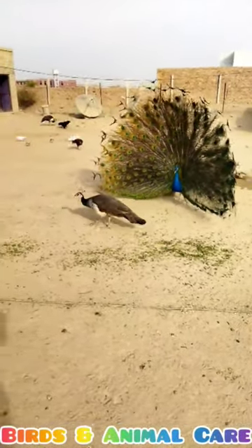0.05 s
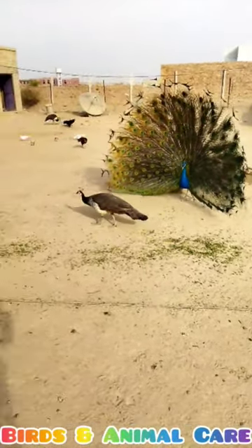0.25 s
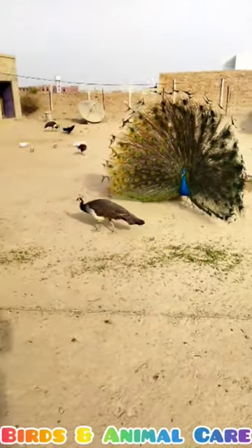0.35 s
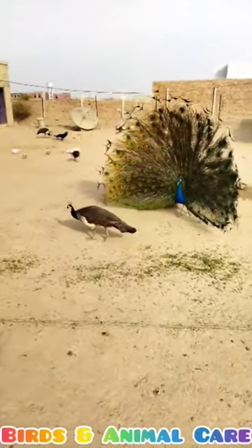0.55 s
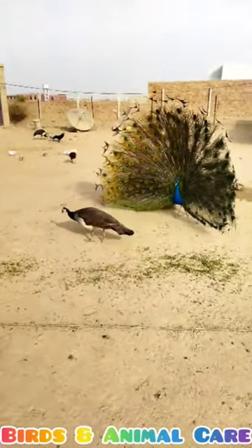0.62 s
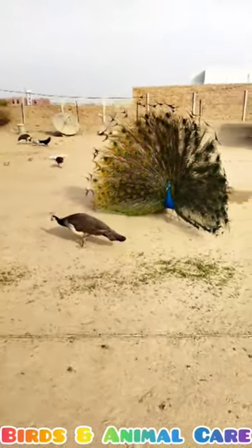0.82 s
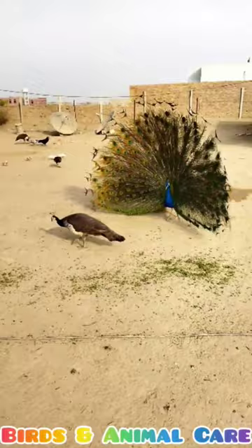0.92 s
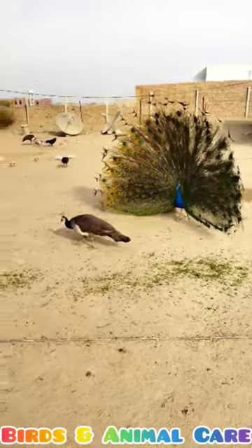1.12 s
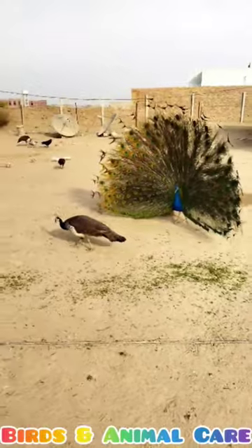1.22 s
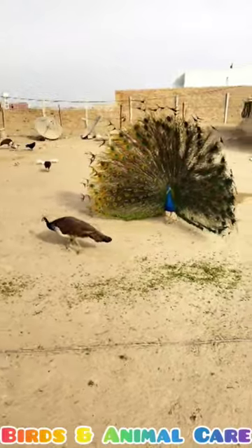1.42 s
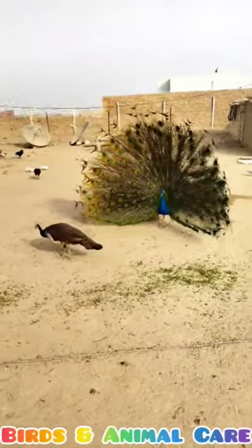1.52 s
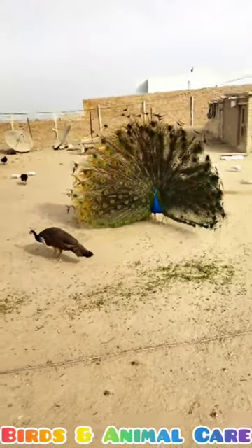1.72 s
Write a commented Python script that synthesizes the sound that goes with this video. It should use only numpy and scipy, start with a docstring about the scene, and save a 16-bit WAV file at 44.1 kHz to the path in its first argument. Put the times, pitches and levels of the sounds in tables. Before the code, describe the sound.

Two loud nasal peafowl cries ring across a walled farmyard over faint chirps, clucks and low rumble

```python
"""Walled farm yard: a peafowl gives two loud, arching, brassy calls, each a stack of overtones with rasp.
Reflections colour the calls differently in each ear; wall echoes and decaying noise leave a short tail.
Small birds chirp in gliding two-voice whistles; fowl cluck and coo softly as low tones with an octave.
Under it lies a low outdoor rumble with hiss: noise in wavering bands."""
import sys
import numpy as np
from scipy import signal
from scipy.fft import rfft, irfft
from scipy.io import wavfile
from scipy.ndimage import uniform_filter1d

SR = 44100
rng = np.random.default_rng(int(sys.argv[2]) if len(sys.argv) > 2 else 0)


def int16_out(signal):
    """Quantize to a 16-bit WAV file."""
    q = np.round(np.clip(np.atleast_2d(signal).T, -1, 1) * 32767)
    wavfile.write(sys.argv[1], SR, q.astype(np.int16))


N = 77175
TIME_S = np.arange(N) / SR

# Peafowl call contours: (time [s], pitch [Hz], level [dB])
CALL_ONE = [(0.228, 330, -53), (0.242, 366.2, -35.5), (0.26, 463, -34), (0.28, 552.7, -32),
            (0.297, 595, -27), (0.33, 593.8, -32), (0.365, 612.4, -29), (0.4, 603.8, -32.5),
            (0.445, 598, -31), (0.49, 568.4, -30.5), (0.53, 542.5, -30.5), (0.58, 513, -36),
            (0.597, 484, -35), (0.612, 400, -41.5)]
CALL_TWO = [(0.957, 330, -47), (0.975, 387, -43), (0.99, 461.6, -34.5), (1.007, 529.5, -36),
            (1.03, 596.7, -33), (1.06, 620, -31.5), (1.09, 649.9, -34.5), (1.135, 643.3, -34.5),
            (1.18, 624.4, -40), (1.2, 648.5, -40.5), (1.222, 648, -34.5), (1.245, 608.5, -34),
            (1.262, 595, -32.5), (1.29, 554.6, -31), (1.312, 549.4, -44), (1.335, 442.3, -36)]
# Throat resonances: (frequency [Hz], relative gain [dB])
THROAT = [(600, -34.5), (900, -18), (1200, -15.5), (1430, -9), (1700, -0.5), (1930, 3), (2280, -6.5),
          (2550, -4), (3050, -21), (3600, -26), (4200, -24), (4600, -17), (5000, -36), (5500, -35.5),
          (6500, -31.5), (8000, -46), (12000, -49.5), (15000, -61)]
# Reflection colour at the ears: (frequency [Hz], left-right level [dB], left-right phase lead [rad])
EAR_COLOUR = [(920, 3, 1.4), (1177, -8.5, -1), (1327, -2, 6), (1440, 21, -4), (1435, 4.5, 3.8),
              (1666, -8.5, -1.5), (1750, -6, -2.5), (1934, 8, -4.5), (2068, 4, 0.5), (2254, -18, 2.2),
              (2263, -9, -0.27), (2587, 8, 3.16), (2528, 5.5, 1.37), (2690, -3, 2), (4860, 0.5, 1.84),
              (7000, -2, 2), (9300, -1.5, 1.5)]
# Breath rasp spectrum shape: (frequency [Hz], relative density [dB per Hz])
RASP_SPECTRUM = [(700, -42), (1200, -31), (1700, -16), (2300, -23), (3100, 1), (4500, 4.5), (5500, 3),
                 (6700, -10), (8500, -1.5), (12000, -19), (15000, -18)]
# Small-bird whistles: (start [s], length [s], start pitch [Hz], middle pitch [Hz], end pitch [Hz],
#   level [dB], left-right level [dB], upper voice re lower [dB])
CHIRPS = [(0, 0.043, 3426, 4020, 4160, -54.5, 2, -35), (0.03, .045, 3774, 4540, 3580, -52.5, 2, -29),
          (0.064, 0.072, 4850, 4540, 3660, -53, 2.5, -6), (0.129, 0.016, 3160, 3250, 3650, -55, 17, -23),
          (.145, .014, 3700, 3920, 3700, -53, 0, 1.5), (0.17, 0.01, 3390, 3240, 3450, -53, 18, -9.5),
          (0.18, 0.051, 3750, 3810, 4150, -56.5, 5, -18), (0.22, 0.024, 6040, 6130, 6200, -55.5, 7, -25),
          (0.601, 0.042, 4540, 4500, 4930, -49, 7, -26), (0.648, 0.073, 3775, 4267, 3685, -43, 2, -1.5),
          (0.728, 0.069, 7100, 7600, 8500, -69.5, 8, 4), (0.753, 0.11, 5310, 5800, 5330, -66, 5, 1.5),
          (1.175, 0.0275, 4250, 5110, 5200, -53, -2, -3), (1.183, 0.043, 3190, 3680, 3920, -51.5, 4, 1),
          (1.212, 0.026, 4030, 3930, 3680, -57, 0, -21), (1.24, .024, 3410, 3820, 3640, -51, -3, -17),
          (1.315, 0.018, 4210, 4500, 4820, -49.5, 2, -30), (1.358, .066, 3600, 4266, 3850, -46.5, 1, 4.5),
          (1.53, 0.03, 4280, 4440, 4880, -50.5, -2, -3), (1.566, 0.075, 3550, 4204, 3740, -53.5, 0, 6.5),
          (1.726, 0.033, 5000, 6060, 6140, -64, 6, -8)]
# Fowl clucks: (start [s], length [s], mid pitch [Hz], peak level [dB], octave re fundamental [dB])
CLUCKS = [(0.723, 0.023, 250, -55, -1.5), (0.814, 0.02, 335, -46.5, -39), (0.856, .024, 320, -61, -28),
          (0.905, .028, 325, -48.5, -34), (1.296, 0.038, 480, -55, -20), (1.348, 0.015, 235, -63.5, 8.5),
          (1.574, 0.084, 390, -67.5, 8)]
# Fowl coo contour: (time [s], pitch [Hz], level [dB])
COO = [(1.09, 256.4, -57), (1.13, 264.6, -55.5), (1.17, 289, -60), (1.24, 296.7, -57), (1.28, 329, -58.5),
       (1.32, 278.5, -60)]
# Wall echoes: (delay [s], level re direct [dB], left-right level [dB])
ECHOES = [(.0095, -21, 2), (.019, -22, -3), (.036, -24, 2), (.078, -24, 0)]
# Outdoor noise spectrum shape: (frequency [Hz], relative density [dB per Hz])
AIR_SPECTRUM = [(25, -80), (45, -28.5), (70, -0.5), (110, -1), (180, -1), (280, -6.5), (400, -9.5),
                (550, -6.5), (800, -13), (1300, -14), (2000, -11), (3000, -15), (4200, -17.5), (5500, -21),
                (8000, -31.5), (10500, -31), (12500, -26), (15500, -35)]
# Likeness of the outdoor noise at the ears: (frequency [Hz], left-right correlation [-1 to 1])
EAR_LIKENESS = [(60, 1), (250, 0.81), (600, 0.74), (1500, 0), (4000, 0), (12000, 0.084)]

# Peafowl
VOICE_DB = -1.6
ATTACK_S, RELEASE_S = 0.0056, 0.013  # shared with the coo
JITTER_SHARE, JITTER_HZ = 0.00603, 246  # rms share of pitch
FLUTTER_DB_AT_THIRD, FLUTTER_HZ = 1.5, 26.4  # grows with harmonic number up to the ninth
CLEAR_PITCH_HZ, SLACK_PITCH_HZ = 626, 454  # harsher as pitch drops
RASP_CLEAR_DB, RASP_SLACK_DB = -29, -18
BEAK_OPENS_S, BEAK_CENTRE_HZ, BEAK_CUT_DB_PER_OCTAVE = 0.034, 1500, 17
EDGE_CENTRE_HZ, EDGE_ONE_DB, EDGE_TWO_DB = 2390, 0, 3.5  # upper-overtone bite of each call
# Chirps
UPPER_OFFSET_HZ, UPPER_END_SPREAD_HZ = 280.5, 292  # spread adds at both ends of a chirp
CHIRP_SECOND_DB, CHIRP_JITTER_SHARE, CHIRP_BEND_POWER = -18, 0.015, 1.9
CHIRP_FLUTTER_DB, CHIRP_RIGHT_LAG_S = 1.2, 0.00005
CHIRP_ECHO_DB, CHIRP_TAIL_DB = 0.5, -2.5  # added to the yard levels
# Fowl
COO_SECOND_DB = -7
CLUCK_FALL_SHARE, CLUCK_JITTER_SHARE = 0.16, 0.0525
# Yard, outdoor noise, top cut
YARD_DB, YARD_T60_S = -10, 0.27
FAR_DB, FAR_T60_S = -16, 0.5
AIR_DB, AIR_WAVER_DB = -55.5, 2.1
CUTOFF_HZ = 15600


def from_db(db):
    """Convert decibels to amplitude gain."""
    return 10 ** (np.asarray(db) / 20)


def rms_one(x):
    """Scale to unit rms."""
    return x / np.sqrt(np.mean(x ** 2) + 1e-20)


def at_hz(points, hz, axis=1):
    """Interpolate a table column over log frequency."""
    table = np.array(points)
    return np.interp(np.log(np.maximum(hz, 1)), np.log(table[:, 0]), table[:, axis])


def drift(hz):
    """Unit-rms random curve: noise through a two-pole low-pass."""
    pole = np.exp(-2 * np.pi * hz / SR)
    noise = rng.standard_normal(2 * N)
    smooth = signal.lfilter([1], [1, -2 * pole, pole * pole], noise)
    return rms_one(smooth[N:])  # drop the filter's start-up


def pan(db):
    """Left and right gains of unit mean power for a level difference."""
    gains = from_db(np.array([db, -db]).reshape(2, -1) / 2)
    return gains / np.sqrt(np.mean(gains ** 2, axis=0))


def running_phase(hz):
    """Integrate a pitch curve to phase in radians."""
    return 2 * np.pi * np.cumsum(hz) / SR


def contour(rows):
    """Smoothed pitch and gain of one call, faded at both ends."""
    time_s, pitch_hz, level_db = np.transpose(rows)
    fade_in = np.clip((TIME_S - time_s[0]) / ATTACK_S + 1, 0, 1)
    fade_out = np.clip((time_s[-1] - TIME_S) / RELEASE_S + 1, 0, 1)
    hz = uniform_filter1d(np.interp(TIME_S, time_s, pitch_hz), size=250)
    return hz, fade_in * fade_out * from_db(np.interp(TIME_S, time_s, level_db))


def peafowl_rasp(hz, phase):
    """Breath noise puffs once per voice cycle, stronger as the pitch drops."""
    puffs = rng.standard_normal((2, N)) * (1 + np.cos(phase))
    shape = from_db(at_hz(RASP_SPECTRUM, np.fft.rfftfreq(N, 1 / SR)))
    rasp = rms_one(irfft(rfft(puffs) * shape, N))
    rasp_db = np.interp(hz, [SLACK_PITCH_HZ, CLEAR_PITCH_HZ], [RASP_SLACK_DB, RASP_CLEAR_DB])
    return from_db(rasp_db) * rasp


def peafowl(rows, edge_db):
    """Overtones glide through fixed throat resonances while the opening beak widens the spectrum."""
    hz, loud = contour(rows)
    phase = running_phase(hz * (1 + JITTER_SHARE * drift(JITTER_HZ)))
    voice, on = np.zeros((2, N)), loud > 0
    shut = np.clip(1 - (TIME_S[on] - rows[0][0]) / BEAK_OPENS_S, 0, 1)
    for k in range(1, 25):
        f = k * hz[on]
        edge = edge_db * np.clip(1 + 2 * np.log2(f / EDGE_CENTRE_HZ), 0, 1)
        beak_cut = BEAK_CUT_DB_PER_OCTAVE * shut * np.abs(np.log2(f / BEAK_CENTRE_HZ))
        flutter = FLUTTER_DB_AT_THIRD * min(k / 3, 3) * drift(FLUTTER_HZ)[on]
        gain = from_db(VOICE_DB + at_hz(THROAT, f) + edge - beak_cut + flutter)
        ear_gain = uniform_filter1d(gain * pan(at_hz(EAR_COLOUR, f)), size=250)
        lead = uniform_filter1d(at_hz(EAR_COLOUR, f, axis=2), size=400)
        ear_lead = lead * np.array([[0.5], [-0.5]])
        start_phase = rng.uniform(0, 2 * np.pi)
        voice[:, on] += np.sqrt(2) * ear_gain * np.sin(k * phase[on] + ear_lead + start_phase)
    return loud * (voice + peafowl_rasp(hz, phase))


def chirps():
    """Gliding whistles from both sides of the syrinx, one voice a little above the other."""
    out, waver = np.zeros((2, N)), 1 + CHIRP_JITTER_SHARE * drift(133)
    for start_s, length_s, start_hz, mid_hz, end_hz, db, side_db, upper_db in CHIRPS:
        on = (TIME_S > start_s) & (TIME_S < start_s + length_s)
        u = 2 * (TIME_S[on] - start_s) / length_s - 1  # -1 at start, 1 at end
        bend = np.abs(np.sin(u * np.pi / 2)) ** CHIRP_BEND_POWER
        hz = (mid_hz + (np.where(u < 0, start_hz, end_hz) - mid_hz) * bend) * waver[on]
        swell = np.sqrt(1 - u * u)
        lower = running_phase(hz)
        upper = running_phase(hz + UPPER_OFFSET_HZ + UPPER_END_SPREAD_HZ * u * u)
        tone = np.sin(lower) + from_db(CHIRP_SECOND_DB) * np.sin(2 * lower)
        tone += from_db(upper_db) * swell ** 2 * np.sin(upper)
        out[:, on] += np.sqrt(2) * from_db(db) * pan(side_db) * swell * tone
    out[1] = np.interp(TIME_S - CHIRP_RIGHT_LAG_S, TIME_S, out[1])
    return out * from_db(CHIRP_FLUTTER_DB * drift(134))


def coo():
    """A faint low tone with its octave rises, then drops at the end."""
    hz, loud = contour(COO)
    phase = running_phase(hz * (1 + 0.018 * drift(70)))
    return np.sqrt(2) * loud * (np.sin(phase) + from_db(COO_SECOND_DB) * np.sin(2 * phase))


def clucks():
    """Short, rough, falling low tones, each with its octave."""
    out, waver = np.zeros(N), 1 + CLUCK_JITTER_SHARE * drift(115)
    for start_s, length_s, pitch_hz, db, octave_db in CLUCKS:
        u = np.clip((TIME_S - start_s) / length_s, 0, 1)
        phase = running_phase(pitch_hz * waver * (1 - CLUCK_FALL_SHARE * (u - 0.5)))
        tone = np.sin(phase) + from_db(octave_db) * np.sin(2 * phase)
        out += from_db(db) * np.sin(np.pi * u) ** 2 * tone
    return np.sqrt(2) * out


def yard(x, echo_db, tail_db):
    """Direct sound plus discrete wall echoes, a short scatter and a faint far tail."""
    out = x.copy()
    for delay_s, db, side_db in ECHOES:
        delayed = np.array([np.interp(TIME_S - delay_s, TIME_S, ear, left=0) for ear in x])
        out += from_db(db + echo_db) * pan(side_db) * delayed
    tail = 0
    for db, t60_s in ((YARD_DB, YARD_T60_S), (FAR_DB, FAR_T60_S)):
        decay = np.exp(-np.log(1000) * TIME_S / t60_s) * np.minimum(TIME_S / 0.01, 1)
        scatter = rng.standard_normal((2, N)) * decay
        tail = tail + from_db(db + tail_db) * rms_one(scatter) / np.sqrt(N)  # unit energy before gain
    return out + signal.fftconvolve(x, tail, axes=1)[:, :N]


def air():
    """Outdoor rumble and hiss: noise in wavering octave bands, alike in both ears in the bass."""
    hz, out = np.fft.rfftfreq(N, 1 / SR), 0
    mid, side = rfft(rng.standard_normal((2, N))) * from_db(at_hz(AIR_SPECTRUM, hz))
    alike = np.clip(at_hz(EAR_LIKENESS, hz), -1, 1)
    ears = np.sqrt(1 + alike) * mid + np.sqrt(1 - alike) * side * [[1], [-1]]
    edges_hz = 20 * 2.0 ** np.arange(11)
    for low, high in zip(edges_hz, edges_hz[1:]):
        band = irfft(ears * ((hz >= low) & (hz < high)), N)
        out = out + band * from_db(AIR_WAVER_DB * drift(36))
    return from_db(AIR_DB) * rms_one(out)


def scene():
    """Calls and chirps with yard reflections; fowl and outdoor noise direct."""
    calls = peafowl(CALL_ONE, EDGE_ONE_DB) + peafowl(CALL_TWO, EDGE_TWO_DB)
    reflected_calls = yard(calls, echo_db=0, tail_db=0)
    reflected_chirps = yard(chirps(), CHIRP_ECHO_DB, CHIRP_TAIL_DB)
    return reflected_calls + reflected_chirps + coo() + clucks() + air()


def record(dry):
    """Cut the top steeply with an elliptic low-pass."""
    low_pass = signal.ellip(10, 0.1, 80, CUTOFF_HZ, fs=SR, output="sos")
    return signal.sosfilt(low_pass, dry)


dry = scene()
out = record(dry)
int16_out(out)
```